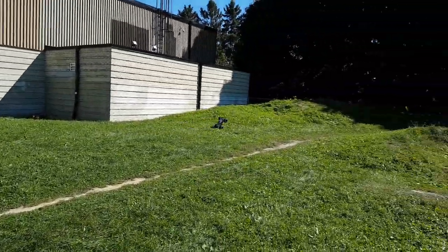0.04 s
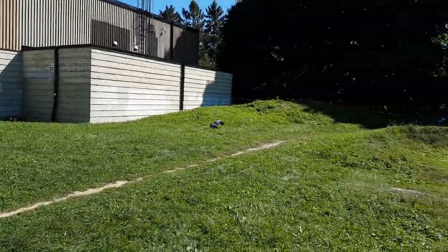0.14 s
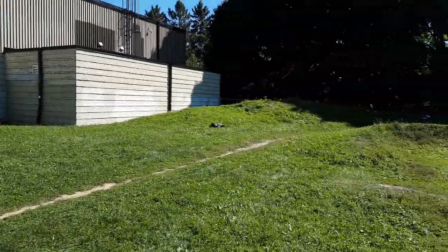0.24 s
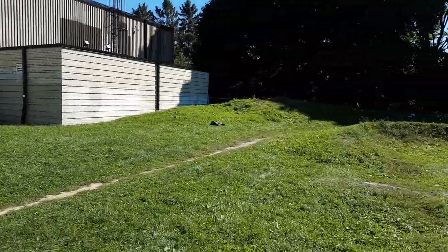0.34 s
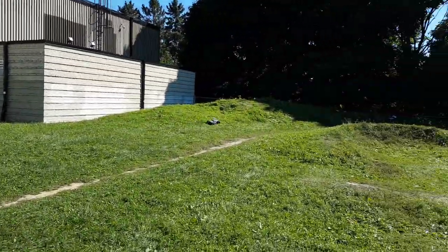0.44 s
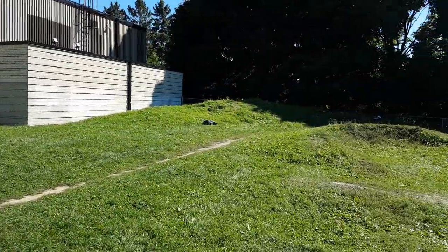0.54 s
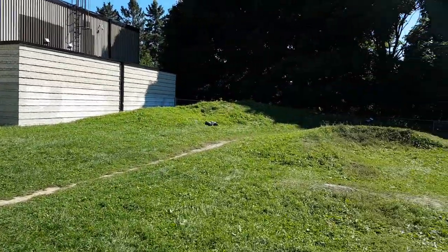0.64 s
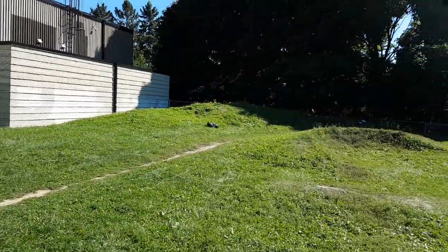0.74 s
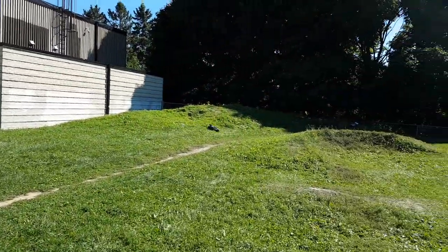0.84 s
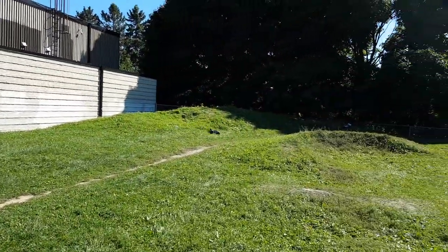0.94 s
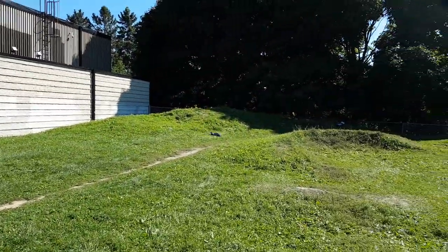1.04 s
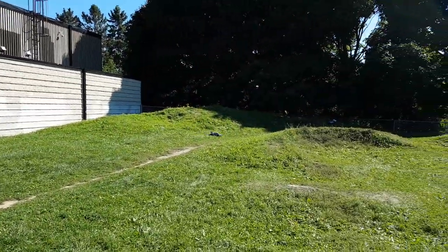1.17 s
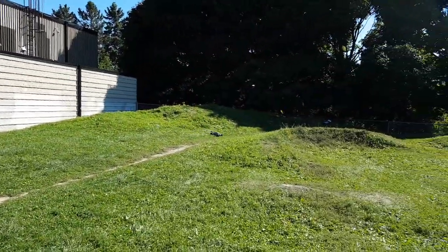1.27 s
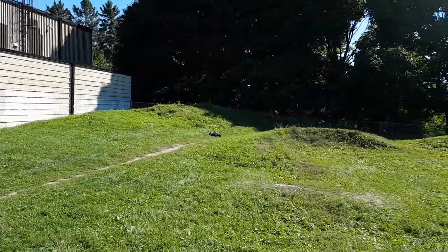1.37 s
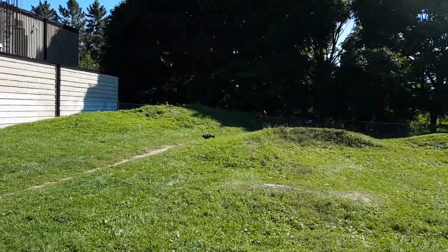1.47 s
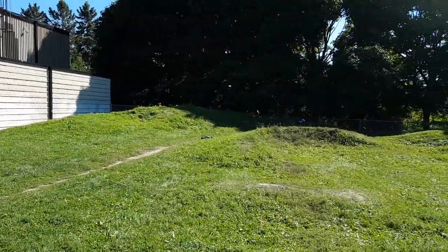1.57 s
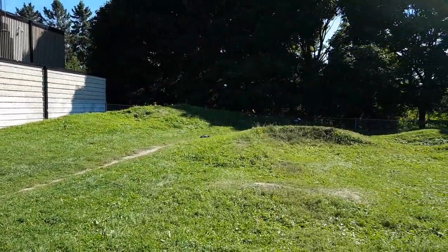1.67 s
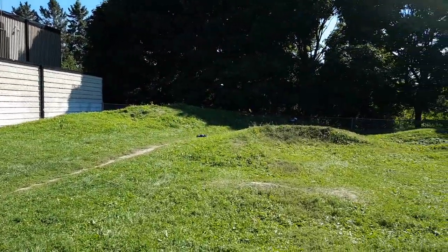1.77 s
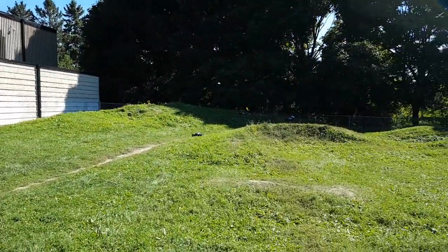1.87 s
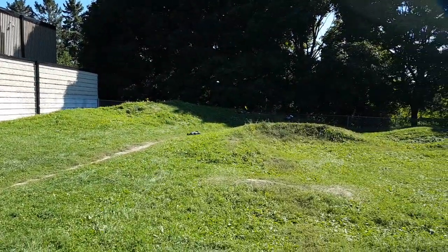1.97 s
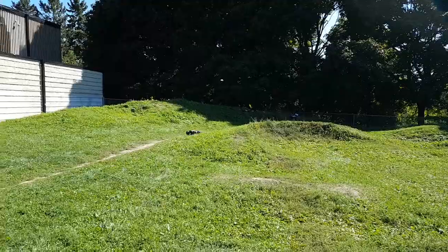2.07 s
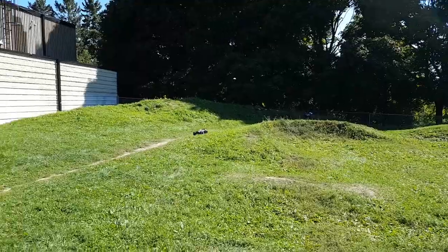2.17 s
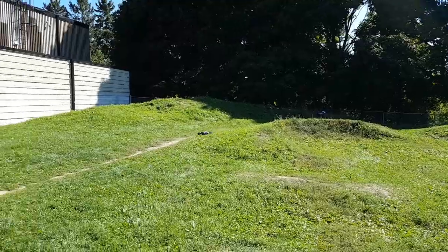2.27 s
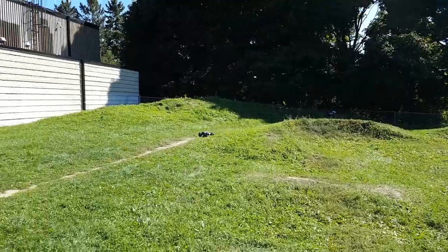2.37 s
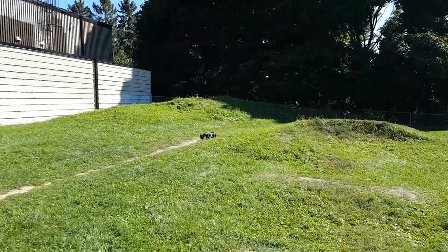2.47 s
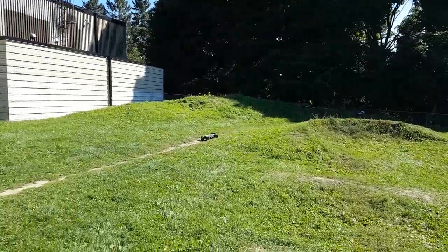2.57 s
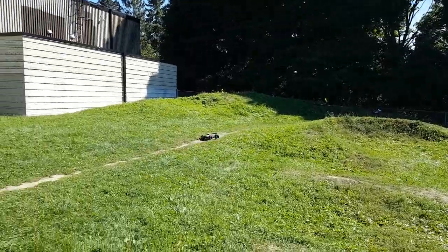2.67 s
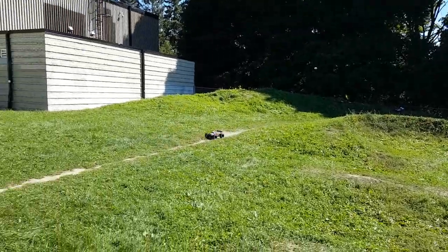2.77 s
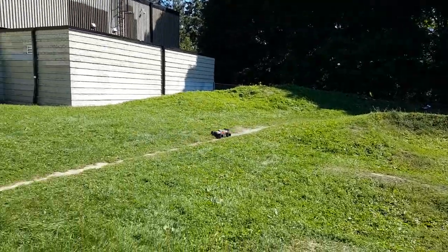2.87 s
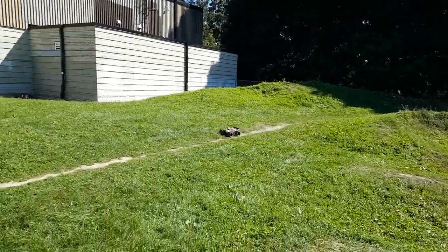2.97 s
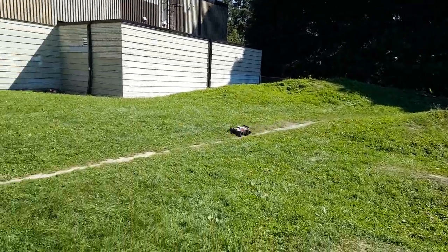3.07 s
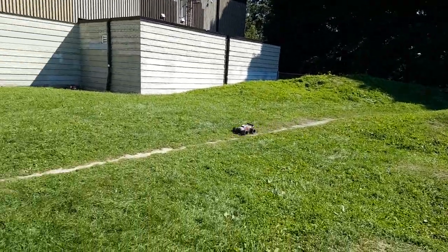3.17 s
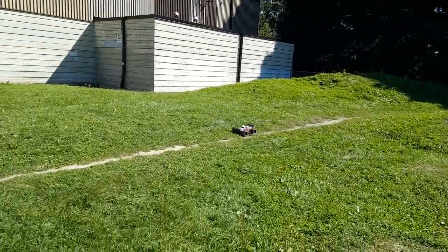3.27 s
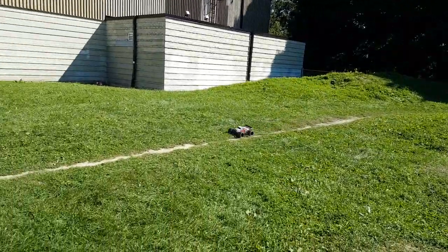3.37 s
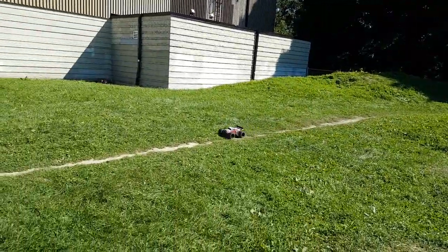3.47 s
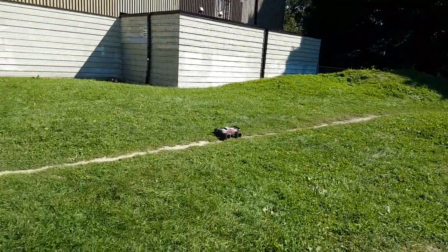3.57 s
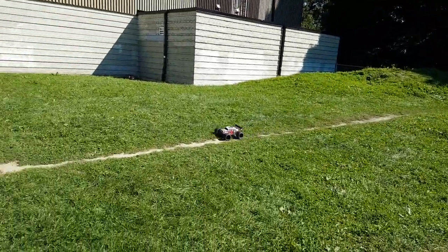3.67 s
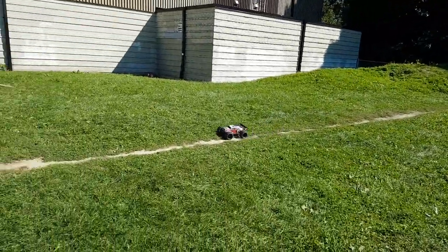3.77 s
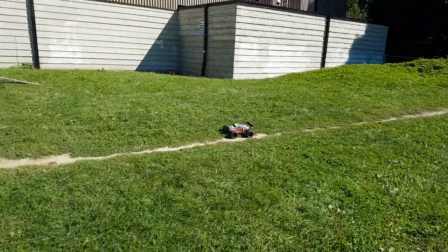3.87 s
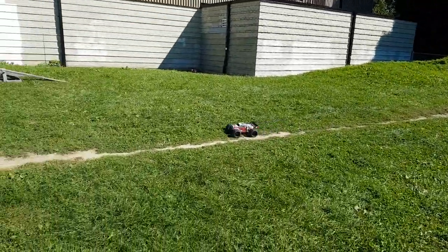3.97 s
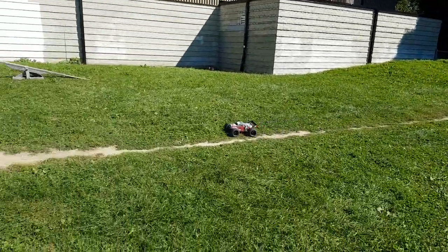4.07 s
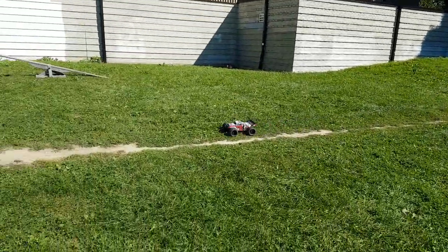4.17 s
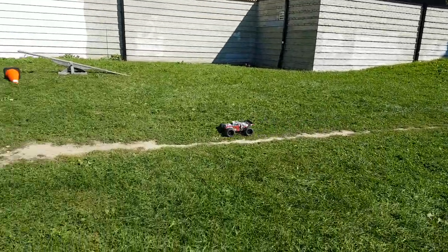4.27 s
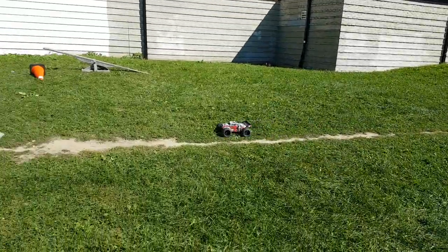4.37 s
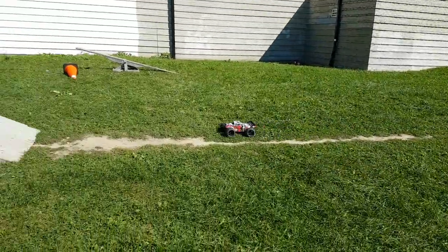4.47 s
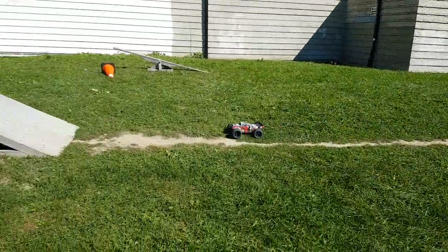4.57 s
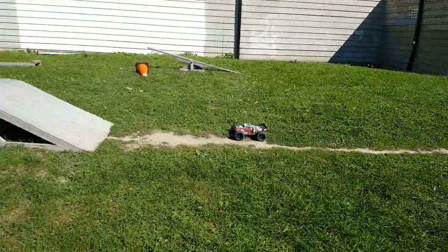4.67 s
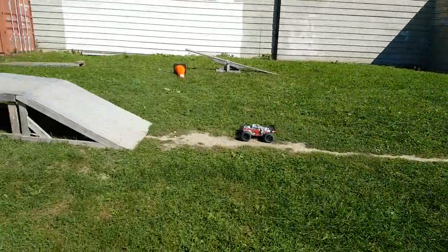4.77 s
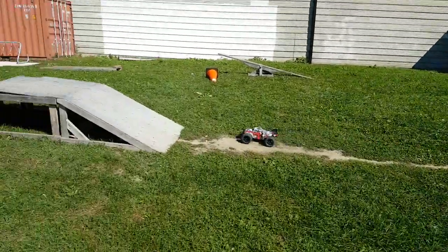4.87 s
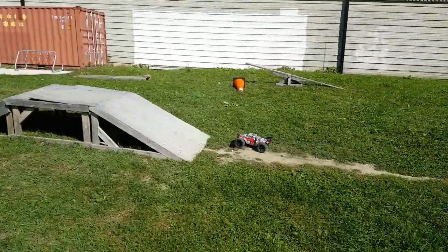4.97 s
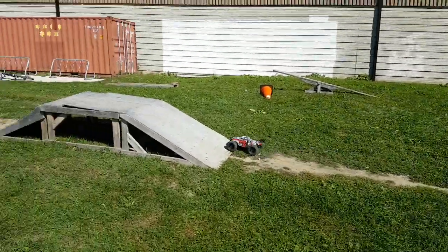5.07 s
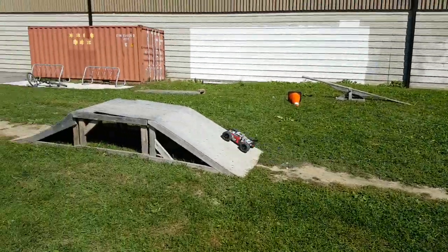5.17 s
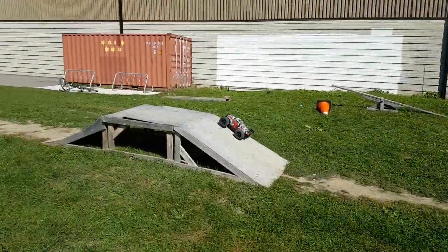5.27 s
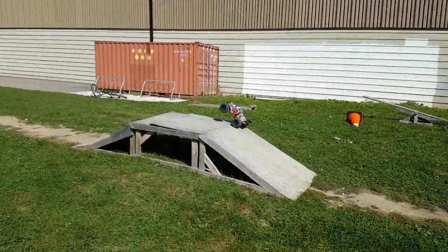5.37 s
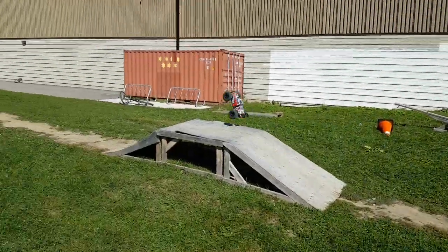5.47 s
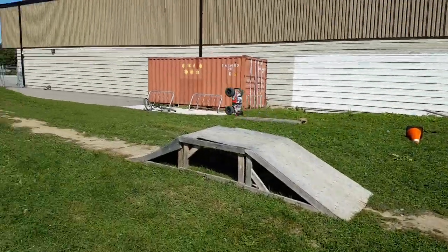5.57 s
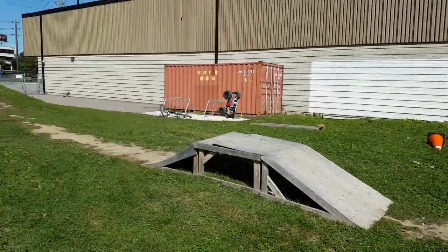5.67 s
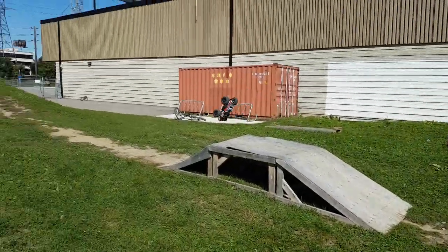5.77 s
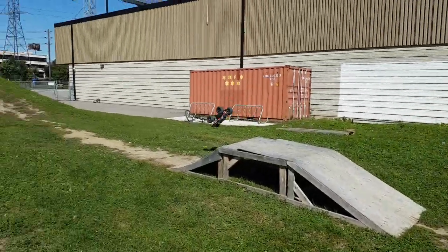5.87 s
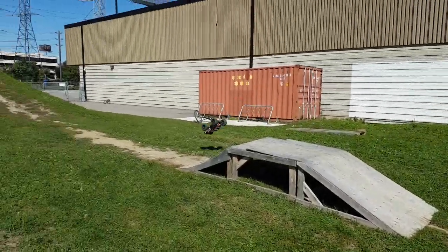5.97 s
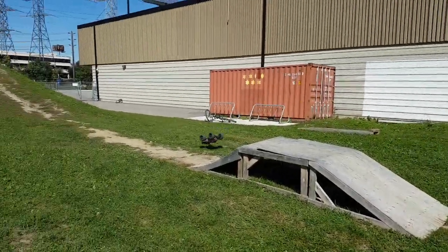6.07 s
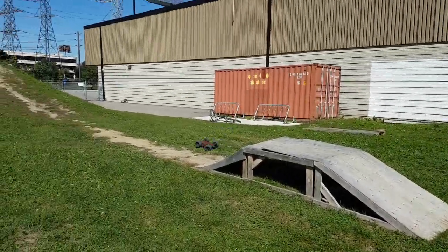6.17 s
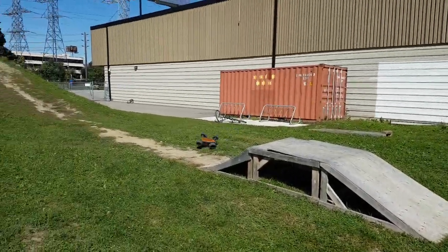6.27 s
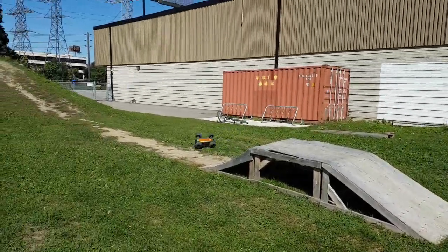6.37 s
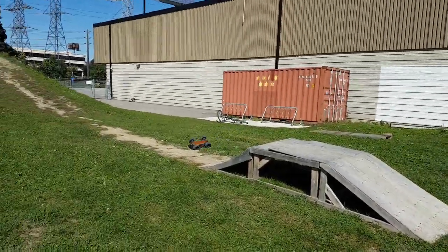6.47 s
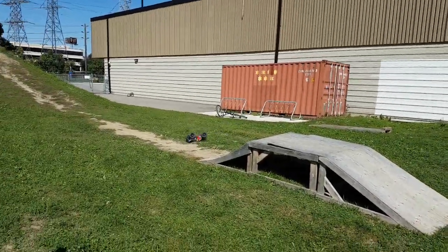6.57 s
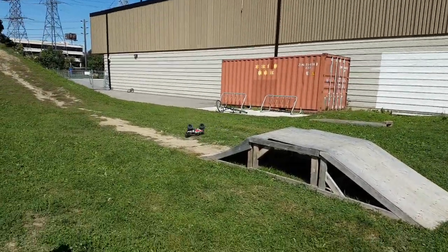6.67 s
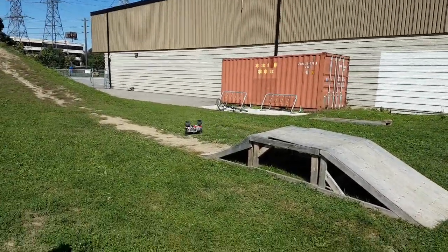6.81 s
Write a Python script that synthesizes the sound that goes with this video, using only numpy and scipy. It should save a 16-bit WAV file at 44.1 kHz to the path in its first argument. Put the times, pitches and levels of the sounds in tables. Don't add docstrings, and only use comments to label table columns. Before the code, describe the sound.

A handheld stereo microphone on grass hears a faint fan hum and town hiss, low wind, and a small electric vehicle. Early bumps and a coasting whine give way to quick throttle stabs, a few bird chirps, then a rising run-up. Wheels knock and rumble on ramp boards, ground noise drops away in the jump, and a heavy clattering landing follows, with short echoes off walls.

```python
import sys
import numpy as np
from scipy import signal
from scipy.fft import rfft, irfft
from scipy.io import wavfile
from scipy.ndimage import uniform_filter1d

SR = 44100
rng = np.random.default_rng(int(sys.argv[2]) if len(sys.argv) > 2 else 0)


def int16_out(signal):
    q = np.round(np.clip(np.atleast_2d(signal).T, -1, 1) * 32767)
    wavfile.write(sys.argv[1], SR, q.astype(np.int16))


def volts_from_db(level):
    exponent = np.asarray(level, float) / 20
    return 10 ** exponent


N = 301644

# (frequency [Hz], width [Hz], level [dB])
DRIVE = [(3455, 360, 1.5), (3976, 570, 1.5), (4480, 580, 1.5), (5310, 490, -2.5), (6020, 280, -7.5),
         (6620, 270, -7), (7290, 330, -5.5)]
# (frequency [Hz], width [Hz], level [dB])
SHELL = [(1310, 97, 0), (1682, 95, 4), (2200, 550, 2), (2490, 266, 3), (3050, 194, -14)]
# (time [s], level [dB])
AIR = [(0.0, -46.5), (0.42, -49), (0.6, -62.5), (1.3, -63), (1.75, -48.5), (2.1, -49), (2.9, -68),
       (3.51, -63.5), (3.77, -45.5), (4.62, -48), (5.15, -50.5), (6.4, -52.5), (6.84, -51)]
# (start [s], length [s], tooth rate at start [Hz], at end [Hz], whine [dB])
STABS = [
    (0.924, 0.061, 1740, 1580, -57.5),
    (0.994, 0.082, 1615, 1780, -52.5),
    (1.437, 0.098, 1610, 2100, -46.5),
    (1.866, 0.13, 2116, 2010, -56),
    (2.076, 0.095, 1545, 2340, -47),
    (2.183, 0.06, 2120, 2350, -56.5),
    (2.263, 0.035, 2180, 2210, -54.5),
    (2.301, 0.1, 2100, 2420, -47.5),
    (2.382, 0.041, 2500, 3510, -48),
    (2.423, 0.062, 3480, 3650, -45),
]
# (time [s], motor load [dB], wheels on the ground [dB], shell drone [dB],
# heading: low shell modes over high [dB])
PATH = [(0.0, -49, -48, -51.5, -3), (0.2, -51.5, -56, -54.5, -4), (0.42, -55, -51, -57.5, -2.5),
        (0.85, -63, -56, -62.5, 2), (1.08, -67, -58, -65.5, 0), (1.38, -61.5, -55.5, -55, -2),
        (1.82, -63.5, -56.5, -64.5, -5), (2.3, -69.5, -58, -61.5, -4), (2.45, -50, -50, -51, -1.5),
        (2.68, -52, -53, -50, 1), (2.8, -58.5, -52.5, -58.5, 0), (3.9, -58.5, -50, -61.5, -2.5),
        (4.0, -54, -49.5, -53, 0.5), (4.6, -49, -48, -44.5, 9.5), (5.15, -46, -37.5, -41, -6.5),
        (5.55, -44.5, -46, -45.5, 2), (6.4, -51, -51, -52.5, -4.5), (6.84, -66.5, -55, -63, 2)]
RAMP_ON_S, RAMP_OFF_S = 5.17, 5.47


def unit(x):
    return x / np.sqrt(np.mean(x ** 2))


def resonance(x, hz, width_hz):
    return signal.lfilter(*signal.iirpeak(hz, hz / width_hz, SR), x)


def ring(x, modes):
    return sum((-1) ** k * volts_from_db(db) * np.sqrt(100 / width) * resonance(x, hz, width)
               for k, (hz, width, db) in enumerate(modes))


def walk(rate):
    hold = int(SR / rate)
    steps = np.repeat(rng.standard_normal(N // hold + 1), hold)
    return 1.375 * uniform_filter1d(uniform_filter1d(steps, hold), hold)[:N]


def grit(spread_db, patchy_db, rate):
    size = np.minimum(rng.exponential(size=N), 5)
    return rng.standard_normal(N) * volts_from_db(spread_db * size + patchy_db * walk(rate))


def shape(x, points):
    return irfft(rfft(x) * points, N)


def on_bins(table, warp):
    hz, value = np.transpose(table)
    return np.interp(warp(np.arange(N // 2 + 1) * SR / N + 1), warp(hz + 1), value)


def gains(table):
    s, *columns = np.transpose(table)
    return [volts_from_db(np.interp(np.arange(N) / SR, s, column)) for column in columns]


def dull(x):
    return signal.sosfilt(signal.butter(4, 6390, fs=SR, output="sos"), x)


def town():
    # frequency [Hz], width [Hz], level [dB]
    hum_tone = (308, 7, -55)
    # (frequency [Hz], level per Hz [dB])
    hiss_colour = [(18, -35), (30, 5), (179, -23), (374, 12.5), (937, -23), (1160, -3.5), (1720, 0),
                   (3060, -7), (4530, -14.5), (16000, -53.5)]
    hz, width, hum_db = hum_tone
    hum = volts_from_db(hum_db + walk(7.23)) * unit(ring(rng.standard_normal(N), [(hz, width, 0)]))
    hiss = unit(shape(rng.standard_normal(N), volts_from_db(on_bins(hiss_colour, np.log))))
    return hum + volts_from_db(-57) * hiss


def bird():
    # (time [s], length [s], start pitch [Hz], end pitch [Hz], level [dB])
    chirps = [
        (3.109, 0.035, 6000, 5750, -57),
        (3.682, 0.03, 4630, 4780, -46.5),
        (3.707, 0.039, 5260, 4600, -49),
        (3.828, 0.036, 5780, 5570, -56.5),
    ]
    out = np.zeros(N)
    for s, length, hz0, hz1, db in chirps:
        u = np.arange(int(length * SR)) / (length * SR)
        turns = length * (hz0 * u + (hz1 - hz0) * u ** 2 / 2)
        out[int(s * SR):][:len(u)] += volts_from_db(db) * np.sin(np.pi * u) * np.sin(2 * np.pi * turns)
    return out


def wind(thud, shared=0.96):
    gust = shared * rng.standard_normal(N) + (1 - shared) * rng.standard_normal((2, N))
    boom_db = 12.5
    level = gains(AIR)[0] * volts_from_db(2.0 * walk(8)) + volts_from_db(boom_db) * thud ** 2
    return level * unit(ring(ring(gust, [(78.6, 94, 0)]), [(58, 140, -6.5), (113, 113, 3)]))


def pop():
    start_s, rise_s, size = 1.8329, .00006, 1.33
    corner, damping = 2 * np.pi * 100, 1.85
    step = size * (1 - np.exp(-np.maximum(np.arange(N) / SR - start_s, 0) / rise_s))
    return signal.lfilter(*signal.bilinear([1, 0, 0], [1, damping * corner, corner ** 2], SR), step)


def ticks():
    # (time [s], peak level [dB], pitch [Hz], time to fall 60 dB [s])
    stones = [(0.218, -29.5, 1190, 0.0077), (0.5623, -19, 1930, 0.014), (1.1818, -40, 2620, 0.008),
              (1.869, -34, 3600, 0.0065), (1.9016, -26.5, 3530, 0.0037), (1.9798, -28.5, 3560, 0.0095),
              (1.991, -35.5, 1200, 0.011), (2.1041, -37, 3620, 0.0089), (2.1938, -22, 3720, 0.0037),
              (2.2894, -38, 3600, 0.0099), (2.648, -35, 366, 0.12), (2.9911, -37.5, 3600, 0.008),
              (3.963, -30.5, 1680, 0.026)]
    out, t = np.zeros(N), np.arange(SR // 10) / SR
    for s, db, hz, t60 in stones:
        out[int(s * SR):][:len(t)] -= volts_from_db(db - 60 * t / t60) * np.sin(2 * np.pi * hz * t)
    return out


def boards():
    on, off, edge_s, level_db = RAMP_ON_S, RAMP_OFF_S, 0.015, -29
    return gains([(on - edge_s, -90), (on, level_db - 3), ((on + off) / 2, level_db), (off, level_db),
                  (off + edge_s, level_db - 9), (off + 0.23, -90)])[0]


def drags():
    # (time [s], drone [dB], rise [s], fall [s], heading: low modes over high [dB])
    grass = [
        (0.68, -57.5, .15, 0.17, -7),
        (1.3, -73, 0.18, 0.069, -12),
        (2.55, -66, 0.15, 0.29, 1),
        (4.37, -41, 0.031, .22, 0),
        (4.8, -63, 0.4, 0.088, 1),
        (5.35, -42.5, 0.19, 0.35, 1),
    ]
    t, low_high = np.arange(N) / SR, np.array([[.5], [-.5]])
    out = 0
    for s, db, rise, fall, heading_db in grass:
        away = np.where(t < s, (s - t) / rise, (t - s) / fall)
        out = out + volts_from_db(db - 20 * away ** 2 + low_high * heading_db)
    return out


def throttle():
    lead_s, overrun, linger_s = 0.0077, 1.3, 0.025
    t, keep = np.arange(N) / SR, np.exp(-1 / (linger_s * SR))
    held = sum(volts_from_db(db) * (t > s - lead_s) * (t < s + overrun * length) for s, length, _, _, db in STABS)
    return signal.lfilter([1 - keep], [1, -keep], held)


def motor(crack):
    # (frequency [Hz], width [Hz], level [dB])
    windings = [(10280, 890, -9), (11940, 500, -6), (15200, 2900, -5.5)]
    load = gains(PATH)[0] + volts_from_db(-12.5) * drags()[1] + volts_from_db(-18) * boards()
    stabs = throttle()
    drive = load + volts_from_db(-6.5) * stabs
    switching = volts_from_db(-19) * load + volts_from_db(-24) * stabs + 0.029 * uniform_filter1d(crack, size=500)
    scatter = grit(2.2, 1.5, 40) + np.array([grit(1.5, 1.0, 30), grit(1.5, 1.0, 30)])
    rattle = (drive + 0.4 * crack) * unit(ring(0.085 * scatter[0] + 2.2 * scatter, DRIVE))
    return dull(rattle) + switching * unit(ring(scatter, windings))


def stab(s, length, hz0, hz1, db):
    spin_up, peak, ends_db = .75, 0.61, 11
    u = np.linspace(0, 1, num=12)
    gained = np.clip(u / spin_up, 0, 1)
    hz = hz0 + (hz1 - hz0) * gained ** 2 * (3 - 2 * gained)
    off_peak = np.where(u < peak, 1 - u / peak, (u - peak) / (1 - peak))
    return np.transpose([s + length * u, hz, db - ends_db * off_peak ** 2])


def through_body(x):
    return .4 * x + .95 * sum(resonance(x, hz, width) for hz, width, _ in SHELL[1:] + DRIVE)


def gears(edge_s=0.0035):
    # (time [s], tooth rate [Hz], whine [dB])
    coast = [
        (0.47, 1790, -57),
        (0.56, 1807, -51),
        (0.78, 1820, -49),
        (0.9, 1780, -61),
    ]
    # (time [s], tooth rate [Hz], whine [dB])
    flight = [
        (5.5, 2277, -65),
        (5.6, 2232, -46),
        (5.8, 2200, -49.5),
        (5.92, 2150, -65),
    ]
    # (time [s], tooth rate [Hz], whine [dB])
    run_up = [(3.97, 1315, -51), (4.04, 1351, -46.5), (4.3, 1427, -47), (4.55, 1544, -45.5),
              (4.86, 1635, -38.5), (4.94, 1895, -30.5), (5.07, 2050, -33), (5.15, 3050, -45),
              (5.19, 3183, -46)]
    # (time [s], tooth rate [Hz], whine [dB])
    climb = [(5.215, 1712, -30), (5.24, 2050, -23.5), (5.272, 2200, -30.5), (5.282, 2924, -38),
             (5.3, 3016, -34), (5.34, 3090, -37), (5.39, 3620, -40), (5.43, 3660, -41), (5.46, 3720, -43)]
    overtones = [-56, -58, -62.5]
    overtone_share = 0.61
    out, tremble = np.zeros(N), 1 + .014 * walk(200)
    throb = [volts_from_db(1.8 * walk(45)) * (.8 + walk(rate) + 1j * walk(rate)) for rate in (240, 380, 520, 620)]
    throb[1:] = [v * volts_from_db(1.8 * walk(40)) for v in throb[1:]]
    bursts = [(coast, -14), (flight, -14), (run_up, 0.2), (climb, -3)]
    bursts += [(stab(*row), 1.5) for row in STABS]
    for burst, top_db in bursts:
        s, hz, db = np.transpose(burst)
        top_db = top_db - 7 * np.maximum(hz - 2150, 0) / 1000
        i = np.arange(int(s[0] * SR), int(s[-1] * SR))
        t = i / SR
        teeth = np.cumsum(np.interp(t, s, hz) * tremble[i]) / SR
        wear = (i[0] // 2 + teeth * SR / 1400).astype(int)
        fade = np.clip(np.minimum(t - s[0], s[-1] - t) / edge_s, 0, 1)
        levels = [db] + [top + top_db + overtone_share * (db + 46) for top in overtones]
        for k, level in enumerate(levels):
            wave = np.real(throb[k][wear] * np.exp(2j * np.pi * (k + 1) * teeth))
            out[i] += fade * volts_from_db(np.interp(t, s, level)) * wave
    return 0.78 * through_body(out)


def blow_gains():
    # (time [s], chassis knock [dB], wheel thud [dB], time to fall 60 dB [s], rise [s])
    blows = [(0.325, -35, -40.5, 0.11, 0.0051), (0.39, -42, -38.5, 0.035, 0.0053),
             (1.642, -35.5, -43, 0.047, 0.0034), (1.671, -37.5, -43, 0.084, 0.0028),
             (2.084, -61, -47, 0.1, .0026), (2.14, -50, -42, .08, .006), (4.38, -58, -43.5, 0.48, .04),
             (2.634, -32, -51, 0.21, 0.014), (2.74, -54, -48, 0.69, 0.064), (1.49, -59, -51, 0.25, .02),
             (5.162, -16, -29.5, 0.13, 0.0021), (5.223, -15, -23.5, 0.048, 0.0024),
             (5.237, -28, -17, 0.045, 0.0016), (5.251, -42, -24, 0.0627, 0.0047),
             (6.205, -11, -26, 0.13, 0.016), (6.261, -20.5, -34, 0.17, 0.0026),
             (6.31, -28, -45, 0.15, 0.002), (6.559, -23, -34, 0.18, 0.0086),
             (6.689, -48, -41, 0.046, 0.0087)]
    out, t = np.zeros((3, N)), np.arange(SR // 2) / SR
    for s, knock_db, thud_db, t60, rise in blows:
        i = int(s * SR)
        crack_db = knock_db - 12.5 + 0.32 * (knock_db + 25.5)
        for row, db, last in zip(out, (knock_db - 6, thud_db + 2, crack_db), (1., 1.2, .7)):
            fall = volts_from_db(db - 60 * np.maximum(t - rise, 0) / (last * t60))
            row[i:i + len(t)] += (fall * np.minimum(t / rise, 1) ** 2)[:N - i]
    return out


def truck(knock, thud, crack):
    # (frequency [Hz], width [Hz], level [dB])
    tyre_modes = [(567, 202, -0.5), (767, 235, 2.5), (1004, 178, 0), (1182, 500, -5.5)]
    # (frequency [Hz], width [Hz], level [dB])
    ground_modes = [(163, 93, -2), (235.5, 48.4, 0), (312.6, 159, 0.5), (421, 210, -3.5)]
    _, wheels, drone, heading = gains(PATH)
    ramp, (low_drag, high_drag) = boards(), drags()
    wheels = wheels * gains([(RAMP_OFF_S, 0), (RAMP_OFF_S + .05, -3), (6.2, -3), (6.22, 0)])[0]
    wheels = wheels + volts_from_db(-12.5) * throttle()
    low_shell = drone * heading ** .5 + low_drag
    high_shell = drone / heading ** .5 + high_drag
    tyres = wheels + ramp
    ground = volts_from_db(-3.5) * wheels * (wheels / volts_from_db(-49)) ** 0.44 + .8 * ramp
    ground = ground + volts_from_db(-10.5) * gains(AIR)[0]
    rattle, scrabble, lumps = grit(2.2, 1.5, 40), grit(2.6, 1.5, 30), grit(2.5, 1.5, 15)
    shake = rattle + .6 * scrabble + 1.1 * rng.standard_normal((2, N))
    out = (low_shell + 0.93 * crack) * unit(ring(shake, SHELL[:2]))
    out += (high_shell + 0.71 * crack) * unit(ring(shake, SHELL[2:]))
    out += (tyres + knock) * unit(ring(scrabble, tyre_modes))
    return out + (ground + thud) * unit(ring(0.51 * scrabble + lumps, ground_modes))


def wall_echoes(x):
    t = np.arange(int(.1 * SR)) / SR
    tails = rng.standard_normal((2, len(t))) * volts_from_db(-60 * t / .05)
    treble = signal.lfilter(*signal.butter(2, 1800, "high", fs=SR), x)
    return np.array([signal.oaconvolve(treble, tail / np.linalg.norm(tail))[:N] for tail in tails])


def scene():
    # (frequency [Hz], left minus right [dB])
    port_colour = [(60, -18), (110, 10), (200, -2), (380, 2.5), (700, -1.5), (1290, -1.5), (2380, -6),
                   (4400, -1.5), (8120, 4), (15000, -0.5)]
    # (frequency [Hz], left leads right by [radians])
    port_lead = [(0, 0), (700, .4), (1300, .75), (2000, 1.5), (3100, 2), (4200, 5), (6000, 13), (16400, 37)]
    knock, thud, crack = blow_gains()
    near = dull(gears() + truck(knock, thud, crack) + ticks() + bird()) + town()
    tilt = volts_from_db(on_bins(port_colour, np.log) / 2) * np.exp(.5j * on_bins(port_lead, np.abs))
    arriving = near + volts_from_db(-5) * wall_echoes(near[0]) + motor(crack)
    out = shape(arriving, np.array([tilt, 1 / tilt])) + wind(thud)
    out += volts_from_db(-76.5) * unit(ring(rng.standard_normal((2, N)), [(12500, 6500, 0)]))
    out[0] += pop()
    return out


def low_pass(x):
    return signal.sosfilt(signal.butter(12, 16790, fs=SR, output="sos"), x)


def record(dry):
    top_hz = 15780
    mix = shape(np.clip(dry, -1, 1), on_bins([(top_hz - 150, 1), (top_hz, 0)], np.abs))
    return low_pass(mix)


dry = scene()
out = record(dry)
int16_out(out)
```